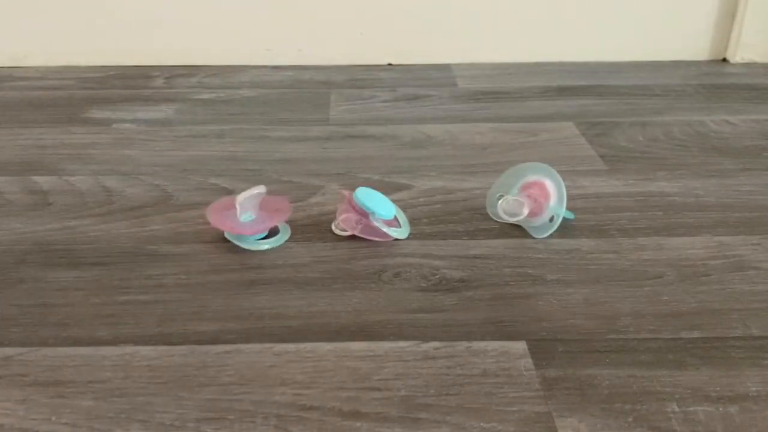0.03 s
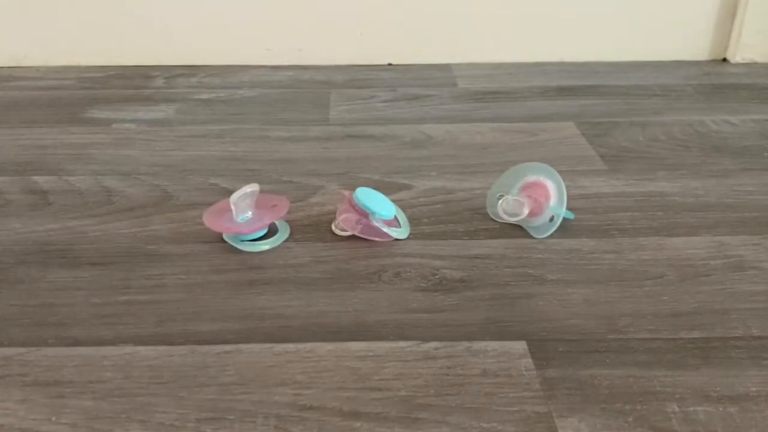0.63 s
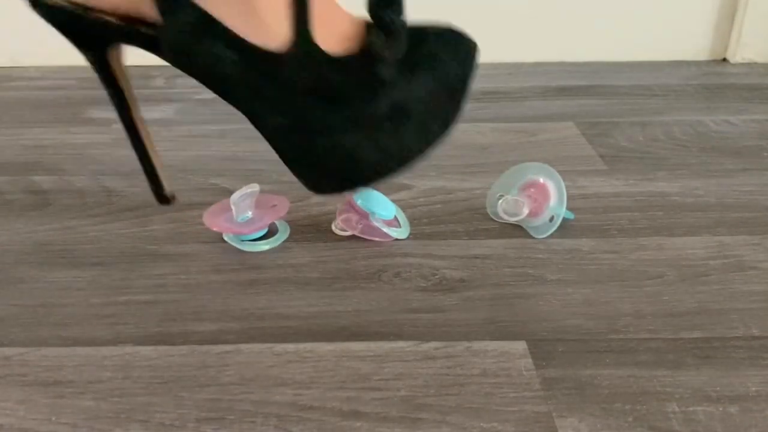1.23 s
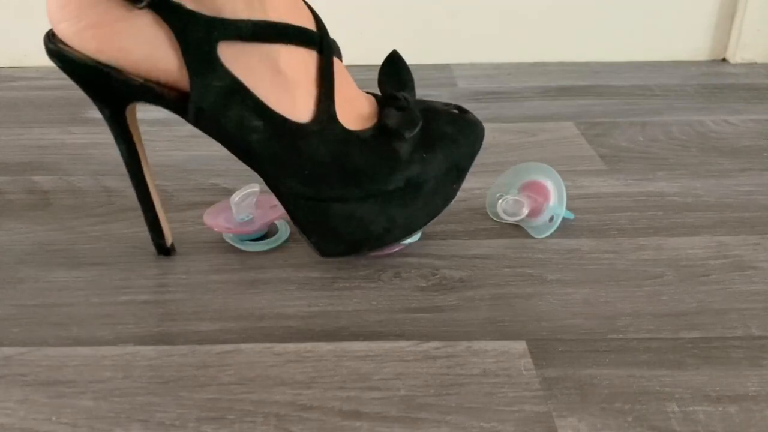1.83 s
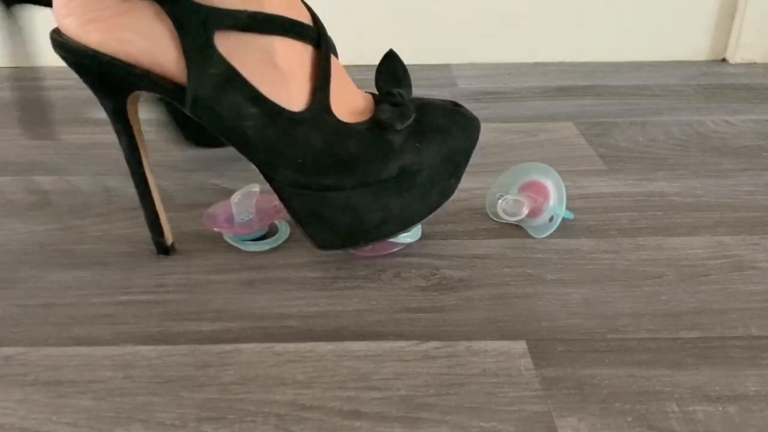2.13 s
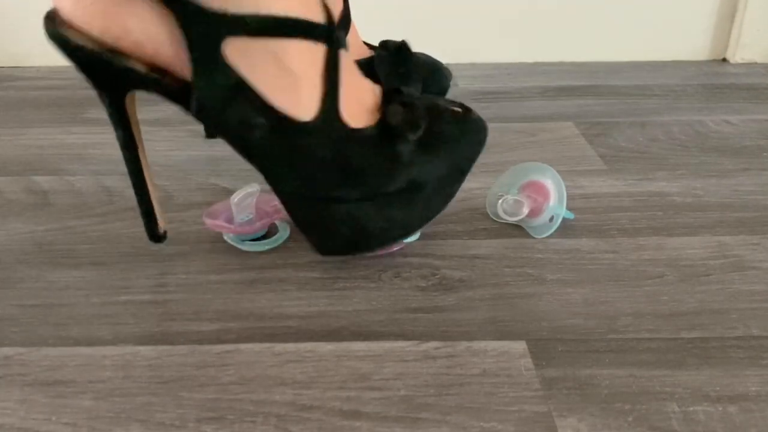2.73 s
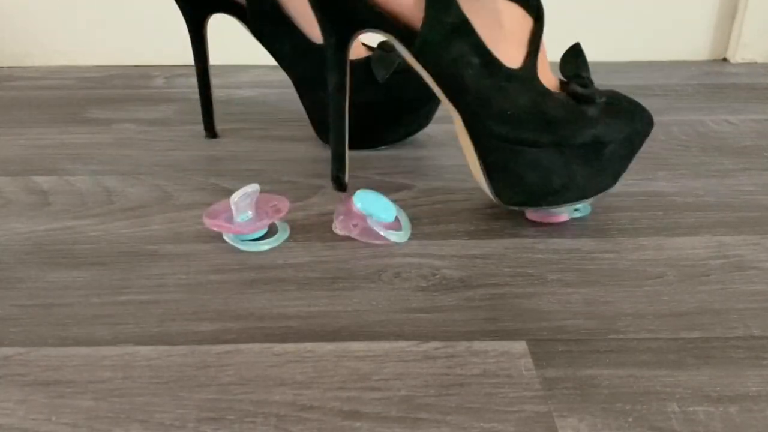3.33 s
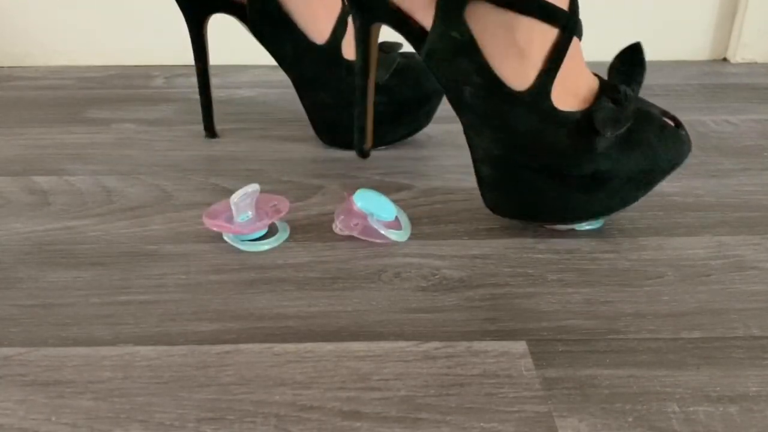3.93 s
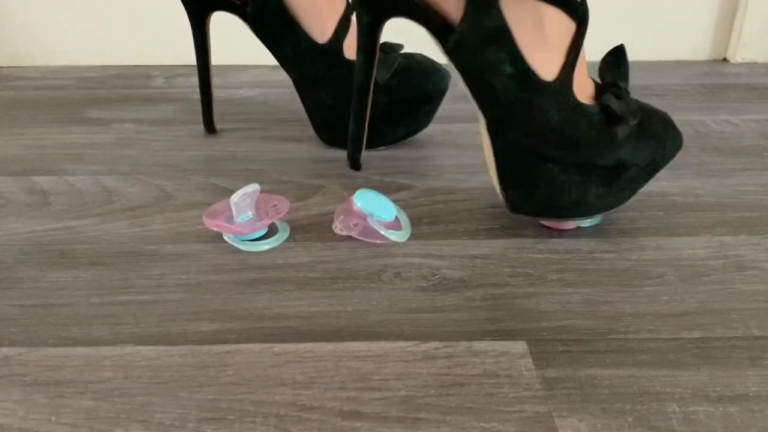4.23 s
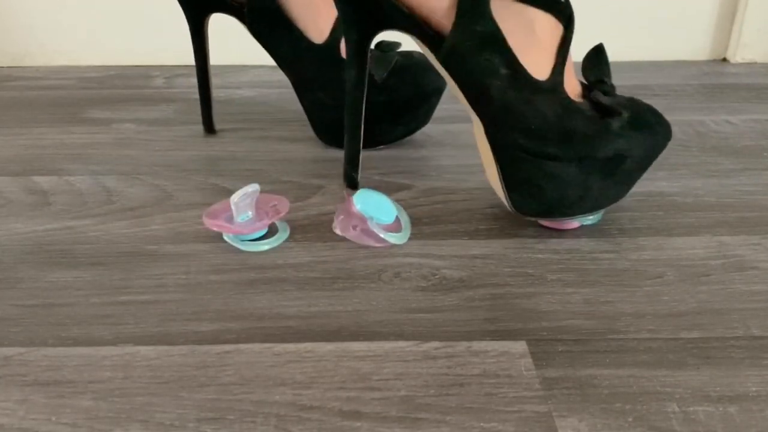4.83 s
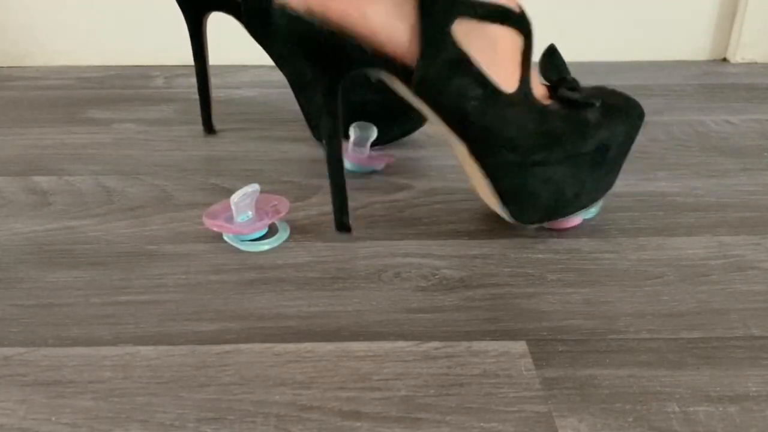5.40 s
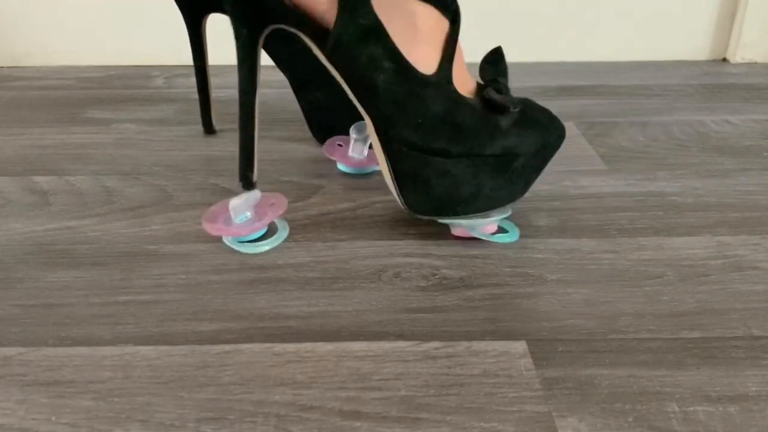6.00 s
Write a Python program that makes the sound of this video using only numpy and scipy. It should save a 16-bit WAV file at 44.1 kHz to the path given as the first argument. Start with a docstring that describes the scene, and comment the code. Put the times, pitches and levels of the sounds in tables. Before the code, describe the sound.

Close, irregular knocks and plastic clicks as platform heels step on pacifiers, with low floor thumps and light scraping in a small room.

```python
"""Platform high heels tread on small plastic pacifiers on a laminate floor in a small room.
The microphone is a phone lying close by. Each contact knocks the hollow sole, raps the boards and
clacks the plastic, and the body's weight thumps the floor. Clothes swish as the walker steps up,
and the soles scrape and scuff between the blows, over a low rumble and a quiet room tone."""
import sys
import numpy as np
from scipy import signal
from scipy.fft import rfft, irfft, next_fast_len
from scipy.io import wavfile
from scipy.ndimage import map_coordinates

SR = 44100
rng = np.random.default_rng(int(sys.argv[2]) if len(sys.argv) > 2 else 0)


def dump_mix(stems):
    """Bounce the given channels to the path in sys.argv[1] as a 16-bit WAV at rate SR."""
    frames = np.atleast_2d(stems).T  # one column per channel
    limited = np.clip(frames, -1, 1)  # hard clip at full scale
    pcm = np.round(limited * 32767).astype(np.int16)
    wavfile.write(sys.argv[1], SR, pcm)


N = 267246


# A sole or heel comes down near the phone. Each row: start in seconds, knock in dB, sole pitch in Hz,
# board rap in dB, clack in dB, plastic pitch in Hz, snap in dB, contact time in seconds, room gain in dB.
HEEL_STAMPS = [(0.592, -59, 655, -76, -61, 4530, -79, .0009, 2.5),
               (0.736, -53.5, 545, -65, -59, 2240, -70.5, 0.0022, 4),
               (1.3222, -39, 591, -54, -46.5, 1830, -50, 0.0014, -2.5),
               (1.351, -48.5, 493, -62, -50.5, 1860, -58.5, 0.0018, 0),
               (1.462, -58, 590, -65.5, -61.5, 3000, -77, 0.0022, 3),
               (1.654, -60.5, 640, -96, -71.5, 2620, -93, .0007, -1.5),
               (1.695, -64, 510, -68, -76, 1570, -85, .0008, 4.5),
               (2.341, -51.5, 660, -61.5, -59.5, 1840, -80, .0015, 0),
               (2.427, -65, 642, -68.5, -74, 1790, -85, 0.00094, -2.5),
               (3.0674, -41.5, 600, -48.5, -45, 1870, -53, 0.0017, -4.5),
               (3.103, -50, 502, -56, -60, 4340, -63, 0.00092, 3),
               (3.115, -39.5, 492, -44, -40, 4350, -49.5, 0.00077, -6),
               (3.302, -74, 653, -74, -97, 1580, -94, .0007, 0.5),
               (3.796, -74, 653, -81, -91, 2800, -87, .0005, 6.5),
               (4.036, -59.5, 455, -70, -87, 2560, -90, 0.00055, 6.5),
               (4.097, -44, 473, -54, -62.5, 1770, -89, 0.00085, -2),
               (4.134, -52, 632, -67, -71, 2640, -99, 0.00064, -7),
               (4.623, -55.5, 695, -59, -58.5, 2170, -68, 0.002, -1),
               (5.0441, -28.5, 636, -33, -30, 1745, -32.5, 0.0021, -6.5),
               (5.089, -46, 634, -56, -44.5, 3540, -48.5, 0.00071, 3.5),
               (5.136, -48.5, 610, -50, -55, 1680, -61.5, .0005, -11),
               (5.8121, -52.5, 493, -54.5, -57, 1660, -69, 0.00075, -0.5)]
def contacts():
    """Each contact clacks and snaps the plastic, knocks the sole and raps the boards; the room answers."""
    out, t = np.zeros((2, N)), np.arange(SR // 8) / SR
    blows = HEEL_STAMPS + plastic_clicks() + sole_ticks()
    for s, knock_db, sole_hz, rap_db, clack_db, plastic_hz, snap_db, contact_s, room_db in blows:
        knock = amp(knock_db) * sole_knock(t, sole_hz)
        rap = amp(rap_db) * board_rap(t)
        grind = edge_grind(t, contact_s)
        sharpness = min(1, 0.002 / contact_s)  # a long contact blunts the first pulse
        clack, clack_to_room = plastic_clack(t, plastic_hz, grind, sharpness)
        snap, snap_to_room = plastic_snap(grind, sharpness)
        add(out, s, amp(clack_db) * clack + amp(snap_db) * snap)
        add(out, s + 0.00073, knock * amp([[.8], [-.8]]) + rap)  # the knock sits slightly left
        radiated = amp(-2.5) * knock + amp(-2) * rap
        radiated += amp(clack_db) * clack_to_room + amp(snap_db) * snap_to_room
        add(out, s + .002, signal.fftconvolve(radiated[None], amp(room_db) * room_tail(), axes=1))
    return out


# The hollow platform. Each row: ratio to its main pitch, level in dB, t60 in seconds.
SOLE_MODES = [(0.721, -5, 0.035), (1.001, 2, .055), (1.26, -12.5, .035)]
# The bare impact. Each row: frequency in Hz, spectral level in dB.
IMPACT_SPECTRUM = [(150, -23.5), (300, -21), (450, 7), (750, 9), (1000, -5.5), (1500, -24.5), (3000, -53)]
def sole_knock(t, hz):
    """The impact rings the hollow sole, which is small and radiates little bass."""
    modes = [(ratio * hz, db, t60) for ratio, db, t60 in SOLE_MODES]
    hollow = ring(modes, t, scatter_db=5.5, detune=0.0017)
    impact = burst(noise(IMPACT_SPECTRUM, len(t)) * fade(t, t60=0.014, attack_s=0.00039))
    bass_cut = signal.butter(N=4, Wn=370, btype="highpass", fs=SR)
    return signal.lfilter(*bass_cut, burst(hollow + amp(-4) * impact))


# The laminate under the shoe. Each row: frequency in Hz, level in dB, t60 in seconds.
LAMINATE_MODES = [(802, -13, 0.066), (977, -15.5, 0.059), (1065, 3.5, 0.015), (1147, -3, 0.039),
                  (1278, -2.5, 0.035)]
def board_rap(t):
    """The struck boards ring briefly."""
    return ring(LAMINATE_MODES, t, scatter_db=-2.0, detune=0.0029)


def edge_grind(t, contact_s):
    """Envelope: the edge grinds during the contact, then the squeezed piece chatters in tiny slips."""
    slips = unit(amp(8.7 * wobble(700, len(t))))
    press = t / contact_s * np.exp(1 - t / contact_s)
    return press + amp(-31) * slips * fade(t, t60=0.11, attack_s=0.0017)


# A pacifier's hard shield and ring. Each row: frequency in Hz, level in dB, t60 in seconds.
SHELL_MODES = [(1816, 12, 0.012), (1840, -3, 0.12), (2450, 0, 0.024), (2670, 3, 0.015),
               (3220, -13.5, 0.071), (3460, -7, 0.022), (3760, -7.5, 0.11), (4313, -7, 0.076),
               (5980, -5.5, 0.035), (6680, -4.5, 0.016)]
# The plastic's crack. Each row: frequency in Hz, spectral level in dB.
CRACK_SPECTRUM = [(700, -39), (1400, 0), (2700, 0), (4200, -1.5), (5300, -5), (7000, -15.5), (9000, -17.5),
                  (12000, -31)]
def plastic_clack(t, hz, grind, sharpness):
    """Struck plastic cracks, pings and rings. Returns the sound at the phone and that sent to the room."""
    # each microphone port hears the crack by another path
    crack = np.array([resonate(noise(CRACK_SPECTRUM, len(t)) * grind, hz, boost_db=13) for _ in range(2)])
    ping = resonate(pulse(CRACK_SPECTRUM, len(t)), hz, boost_db=7)
    shell = ring(SHELL_MODES, t, scatter_db=4.5, detune=0.0062)
    direct = amp(-8.5) * shell + amp(-5) * crack + amp(-11) * sharpness * ping
    return direct, amp(-4) * ping + amp(-12) * shell


# The plastic's sharp snap. Each row: frequency in Hz, spectral level in dB.
SNAP_SPECTRUM = [(4000, -30), (7000, -5.5), (8500, -1), (10000, 0.5), (12500, -6), (14000, -6.5),
                 (15500, -6.5), (17000, -31.5)]
def plastic_snap(grind, sharpness):
    """A bright pulse and grinding hiss reach the phone; the pulse alone is returned for the room."""
    spike = pulse(SNAP_SPECTRUM, len(grind))
    hiss = burst(noise(SNAP_SPECTRUM, len(grind)) * grind)
    return hiss + amp(-3.5) * sharpness * spike, spike


# Pacifiers clicking near the phone. Each row: start in seconds, clack in dB, plastic pitch in Hz,
# snap in dB, board rap in dB, room gain in dB.
PLASTIC_CLICKS = [(0.643, -63.5, 3440, -79, -73, -5), (1.3896, -38.5, 3130, -45, -71, -7.5),
                  (1.405, -46.5, 2630, -73, -72, -1.5), (1.739, -65.5, 6100, -69.5, -71, 2.5),
                  (2.659, -54, 2860, -69, -69.5, -2.5), (2.719, -55.5, 2720, -68.5, -59, -4),
                  (2.769, -58, 1540, -86, -62, -9), (2.783, -61.5, 4100, -73, -62, 2),
                  (2.825, -65, 3900, -67, -79, -5), (2.846, -64.5, 3040, -72, -62, -4),
                  (3.1235, -50, 4400, -53.5, -63, -14), (3.126, -54, 4230, -56.5, -63, -1.5),
                  (5.104, -55, 2590, -55, -52, -4), (5.112, -43, 2590, -59, -49, -3),
                  (5.142, -60, 2520, -54, -65, -4), (5.305, -44, 1900, -47.5, -59, -0.5),
                  (5.326, -58, 3080, -61.5, -67, 1), (5.343, -49.5, 3100, -43.5, -59.5, -2.5),
                  (5.421, -58, 1870, -87, -71, 3), (5.615, -51.5, 2550, -78, -63.5, -4.5),
                  (5.64, -54, 2310, -95, -72, -4), (5.659, -45.5, 1860, -78, -51.5, -3.5),
                  (5.737, -59, 1720, -63, -76, -2.5), (5.7961, -57, 1670, -53, -67, -5.5),
                  (5.858, -61, 1620, -83.5, -62, 0)]
LIGHT_SOLE_HZ, LIGHT_CONTACT_S = 616, 0.00082  # sole pitch and contact time under a light touch
def plastic_clicks():
    """A squeezed piece gives way, springs off or lands; rows as in HEEL_STAMPS."""
    return [(s, rap_db - 1, LIGHT_SOLE_HZ, rap_db, clack_db, hz, snap_db, LIGHT_CONTACT_S, room_db)
            for s, clack_db, hz, snap_db, rap_db, room_db in PLASTIC_CLICKS]


def sole_ticks(count=8, start_s=3.2, end_s=5.0, plastic_hz=2410):
    """The loaded sole ticks faintly at random moments; rows as in HEEL_STAMPS."""
    rows = []
    for when, strength in rng.random((count, 2)):
        s = start_s + when * (end_s - start_s)
        db = -78.5 + 3 * (2 * strength - 1)
        rap_db, clack_db, snap_db = db - 3.5, db - 13.5, db - 19.5
        rows.append((s, db, LIGHT_SOLE_HZ, rap_db, clack_db, plastic_hz, snap_db, LIGHT_CONTACT_S, 0))
    return rows


# Weight lands on the floor. Each row: start in seconds, level in dB, pitch in Hz, t60 in seconds.
FLOOR_THUMPS = [(0.46, -35, 201.8, 0.28), (0.523, -38.5, 91, 0.11), (0.596, -30, 104.3, 0.12),
                (0.645, -37, 102.7, 0.17), (.737, -35, 98.3, .25), (0.774, -37.5, 94, 0.17),
                (1.426, -40.5, 86.5, 0.082), (1.47, -42.5, 165, 0.071), (1.805, -43.5, 92.6, 0.32),
                (2.343, -39, 107, .11), (2.392, -40.5, 71.5, 0.27), (2.767, -27, 58.36, 0.49),
                (2.873, -40.5, 58.3, 0.38), (3.079, -40, 87, .15), (3.132, -41.5, 52, 0.25),
                (3.768, -50.5, 59.6, 0.53), (4.069, -42.5, 110, .15), (4.101, -40, 165, 0.11),
                (4.106, -54.5, 324, 0.26), (4.192, -47, 57.3, 0.43), (5.085, -30, 107.5, 0.16),
                (5.141, -31.5, 63.5, .26), (5.399, -42.5, 47, 0.23), (5.724, -54.5, 49.7, 0.54)]
# The boards after a thump. Each row: frequency in Hz, spectral level in dB.
MUTTER_SPECTRUM = [(25, -24), (60, -1), (110, 1.5), (200, -5.5), (330, -16.5), (600, -32), (1200, -61.5)]
def floor_thumps():
    """Weight swings the floating floor at a pitch that depends on the spot; the boards mutter after it."""
    out, t = np.zeros((2, N)), np.arange(SR // 2) / SR
    for s, db, hz, t60 in FLOOR_THUMPS:
        swing = np.sin(2 * np.pi * hz * t) * fade(t, t60, attack_s=0.0068)
        mutter = diffuse(MUTTER_SPECTRUM, len(t)) * fade(t, t60=0.34, attack_s=0.0047)
        mutter_db = -11.5 + 6.5 * np.log2(hz / 100)  # stiffer spots mutter more
        add(out, s, amp(db) * (swing + amp(mutter_db) * mutter))
    return out


# The rows at 1.319 and 5.301 s are a brief soft hiss just before a loud clack; the rest are sole scrapes.
# Each row: middle in seconds, width in seconds, relative level in dB, pitch in Hz, octaves to 6 dB down.
SCRAPES_AND_HISSES = [(.1, 0.026, -72, 2700, .5), (.96, 0.069, -59.5, 2220, 1.01),
                      (1.319, 0.0041, -63, 900, 1.9), (1.779, 0.03, -73, 5300, 0.2),
                      (2.111, 0.055, -66, 990, 0.86), (2.336, 0.0026, -45, 676, 0.26),
                      (2.75, 0.047, -72, 3470, 1.7), (2.879, 0.028, -67, 990, 0.19),
                      (3.133, 0.016, -46, 4830, 0.8), (3.629, 0.03, -71, 1800, 1.2),
                      (3.82, .023, -72.5, 1220, 1.9), (3.939, 0.014, -71, 2900, 1.1),
                      (4.13, 0.024, -68.5, 4600, 0.17), (5.031, 0.014, -57.5, 860, 1.7),
                      (5.075, 0.019, -40, 2930, 1.1), (5.301, 0.0024, -55, 3500, .94),
                      (5.69, 0.016, -64, 1960, 0.46)]
def scrapes_and_hisses():
    """A rough band of noise swells and dies: a dragged sole sticking and slipping, or a brief hiss."""
    out, t = np.zeros((2, N)), np.arange(SR // 2) / SR - .25
    for s, width_s, db, hz, octaves in SCRAPES_AND_HISSES:
        band = [(hz * 2 ** (k * octaves), -6 * k * k) for k in range(-4, 5)]
        roughness = unit(amp(2.1 * wobble(150, len(t))))
        swell = np.exp(-.5 * (t / width_s) ** 2)
        add(out, s + t[0], amp(db - 0.5) * swell * roughness * diffuse(band, len(t)))
    return out


# A sole settles or turns. Each row: peak time in seconds, relative level in dB.
SOLE_SCUFFS = [(.08, -60), (.19, -61.5), (.64, -65.5), (.78, -59), (.9, -66), (1.03, -69.5), (1.54, -86),
               (1.83, -66.5), (1.97, -65.5), (2.73, -61), (2.8, -62.5), (3.2, -68), (3.62, -68),
               (3.81, -71), (4.2, -71), (4.46, -70.5), (4.8, -78), (5.19, -53.5), (5.69, -54)]
# Its rubbing. Each row: frequency in Hz, spectral level in dB.
SCUFF_SPECTRUM = [(200, -10), (500, 2), (1000, -1.5), (2000, -8.5), (3500, -10), (6000, -16), (12000, -32)]
def sole_scuffs():
    """Soles rub in small uneven catches; the restless feet never quite fall silent."""
    catch_db = 1.2 * wobble(41, N) + 1.1 * wobble(260, N)
    rubbing = swells(SOLE_SCUFFS, rise_s=0.044, fall_s=0.062, rest_db=-83)
    return rubbing * amp(catch_db - 4) * diffuse(SCUFF_SPECTRUM, N)


# A leg swings as the walker nears the phone. Each row: peak time in seconds, relative level in dB.
LEG_SWINGS = [(.19, -58), (.86, -69), (.99, -62.5)]
# Sliding cloth. Each row: frequency in Hz, spectral level in dB.
CLOTH_SPECTRUM = [(800, -25), (2500, -1), (5000, 0.5), (8000, 0.5), (10500, 3), (13000, 0.5), (15500, 0.5)]
def clothes_swish():
    """Cloth slides smoothly, with a fine grain, and rustles faintly between swings."""
    weave_db = 1.3 * wobble(400, N)
    sliding = swells(LEG_SWINGS, rise_s=0.07, fall_s=0.036, rest_db=-85)
    return sliding * amp(weave_db + 3.5) * diffuse(CLOTH_SPECTRUM, N)


# The walker shifts weight. Each row: peak time in seconds, level in dB.
WEIGHT_SHIFTS = [(0.0, -60), (.63, -55.5), (.81, -49.5), (1.38, -56.5), (1.82, -51.5), (3.12, -56),
                 (4.16, -55), (4.84, -59.5), (5.11, -48), (5.34, -55), (5.72, -58)]
# The loaded floor. Each row: frequency in Hz, spectral level in dB.
RUMBLE_SPECTRUM = [(15, -26), (25, -19.5), (54, 5), (97, -4), (135, -10.5), (227, -11.5), (260, -27),
                   (330, -11), (430, -32.5), (600, -22.5), (780, -55), (1320, -120)]
def floor_rumble():
    """The floor rumbles with each shift of weight, and faintly while the walker stands."""
    return swells(WEIGHT_SHIFTS, rise_s=0.048, fall_s=.11, rest_db=-71) * diffuse(RUMBLE_SPECTRUM, N)


# The small room's decay. Each row: frequency in Hz, t60 in seconds.
ROOM_DECAY = [(100, 0.61), (400, 0.22), (1000, 0.3), (3000, 0.29), (7000, 0.3), (11000, 0.18),
              (16000, 0.24)]
def room_tail():
    """The room's answer to a blow; each frequency dies at its own speed."""
    nearly_white = diffuse([(20, 0.0096), (20000, 0.0087)], SR // 2)
    hz, t, bands = signal.stft(nearly_white, SR, nperseg=256)
    decay = fade(t, along(ROOM_DECAY, hz)[:, None], attack_s=0.00088)
    tail = signal.istft(bands * decay, SR, nperseg=256)[1]
    return tail / np.linalg.norm(tail[0])


# The quiet room around the phone. Each row: frequency in Hz, spectral level in dB.
ROOM_TONE_SPECTRUM = [(25, -3), (58, 14), (80, -1.5), (200, -7), (500, -15), (1500, -18), (4000, -25.5),
                      (8000, -32.5), (11000, -30.5), (16000, -33)]
def room_tone():
    """A steady, bass-heavy hush."""
    return amp(-71) * diffuse(ROOM_TONE_SPECTRUM, N)


# Diffuse sound at the phone's two ports. Each row: frequency in Hz, left-right likeness from 0 to 1.
PORT_LIKENESS = [(60, 0.91), (300, 0.83), (700, 0.35), (1400, 0.12), (3000, 0), (6000, 0)]
def diffuse(spectrum, size):
    """Stereo noise of rms 1, alike in the bass and unrelated in the treble."""
    m = next_fast_len(size, True)
    hz = np.fft.rfftfreq(m, 1 / SR)
    turn = np.arccos(np.clip(along(PORT_LIKENESS, hz), -1, 1)) / 2
    coloured = rfft(rng.standard_normal((2, m))) * amp(along(spectrum, hz))
    mid, side = irfft(coloured * [np.cos(turn), np.sin(turn)], m)[:, :size]
    return unit(np.array([mid + side, mid - side]))


def noise(spectrum, size):
    """Coloured noise of rms 1."""
    hz = np.fft.rfftfreq(size, 1 / SR)
    return unit(irfft(rfft(rng.standard_normal(size)) * amp(along(spectrum, hz)), size))


def pulse(spectrum, size):
    """The briefest pulse with this spectrum, padded to size samples."""
    hz = np.fft.rfftfreq(512, 1 / SR)
    spike = np.roll(irfft(amp(along(spectrum, hz))), 64)[:256]
    return np.pad(burst(spike), (0, size - 256))


def ring(modes, t, scatter_db, detune):
    """Modes struck at a new spot: strengths and pitches shift with the load."""
    hz, db, t60 = np.transpose(modes)[:, :, None]
    level, shift, side = rng.standard_normal((3, len(modes), 1))
    envelopes = np.sign(side) * amp(db + scatter_db * level - 60 * t / t60)
    return burst(np.sum(envelopes * np.sin(2 * np.pi * hz * (1 + detune * shift) * t), 0))


def resonate(x, hz, boost_db):
    """Stress one broad resonance of the piece that is struck."""
    return burst(x + amp(boost_db) * signal.lfilter(*signal.iirpeak(hz, Q=7, fs=SR), x))


def swells(rows, rise_s, fall_s, rest_db):
    """Gain that swells up to each (s, dB) and dies away after it, over a resting level."""
    s, db = np.transpose(rows)[:, :, None]
    t = np.arange(N) / SR - s
    shape = np.exp(-.5 * (np.minimum(t, 0) / rise_s) ** 2 - np.maximum(t, 0) / fall_s)
    return np.sqrt(np.sum((amp(db) * shape) ** 2, 0) + amp(rest_db) ** 2)


def fade(t, t60, attack_s):
    """A quick rise and a decay of 60 dB in t60 seconds."""
    return amp(-60 * t / t60) * (1 - np.exp(-t / attack_s))


def wobble(rate, size):
    """A smooth random curve, rate knots a second."""
    knots = rng.standard_normal(int(size * rate / SR) + 4)
    return map_coordinates(knots, [np.arange(size) * rate / SR])


def along(points, hz):
    """Interpolate (Hz, value) points on a log axis."""
    f, v = np.transpose(points)
    return np.interp(np.log(hz + 1), np.log(f + 1), v)


def amp(db):
    """Decibels to gain."""
    return 10 ** (np.asarray(db) / 20)


def unit(x):
    """Scale to rms 1."""
    return x / np.sqrt(np.mean(x ** 2) + 1e-20)


def burst(x):
    """Scale a short sound to the energy of 20 ms at rms 1."""
    return x * np.sqrt(.02 * SR / (np.sum(x ** 2) + 1e-20))


def add(track, s, sound):
    """Mix a sound into the track at s seconds."""
    part = track[:, max(round(s * SR), 0):][:, :sound.shape[-1]]
    part += sound[..., :part.shape[1]]


def scene():
    """Everything that reaches the phone."""
    foreground = contacts() + floor_thumps() + scrapes_and_hisses() + sole_scuffs()
    return foreground + clothes_swish() + floor_rumble() + room_tone()


def record(dry):
    """The phone: in the treble both channels carry one signal, the right a little early."""
    top_hz, lead_s = 16300, .000204
    m = next_fast_len(N + 8192, True)
    hz = np.fft.rfftfreq(m, 1 / SR)
    left, right = rfft(dry, m)
    crossfade = np.clip((hz - 5800) / 1000, 0, 1) * np.pi / 2
    lead = np.exp(2j * np.pi * (hz - 6100) * lead_s)
    right = np.cos(crossfade) * right + np.sin(crossfade) * lead * left
    return irfft(np.array([left, right]) * (hz < top_hz), m)[:, :N]


dry = scene()
out = record(dry)
dump_mix(out)
```